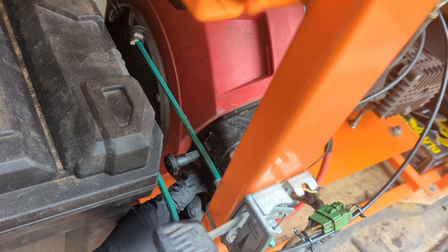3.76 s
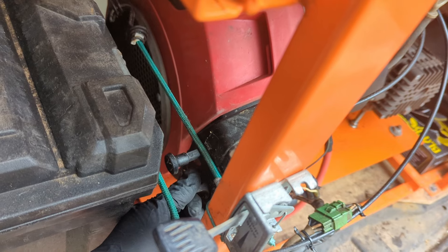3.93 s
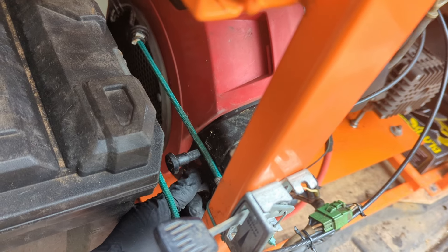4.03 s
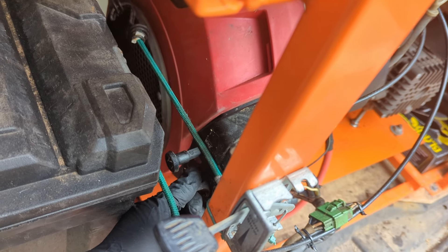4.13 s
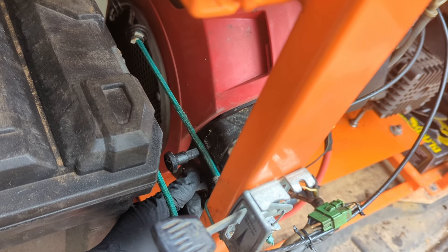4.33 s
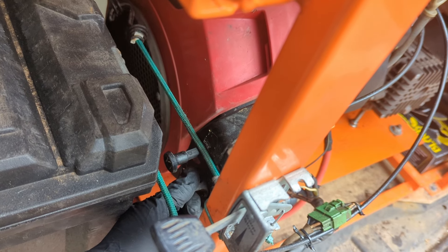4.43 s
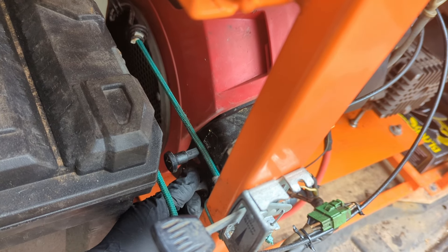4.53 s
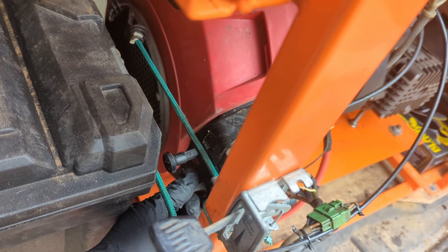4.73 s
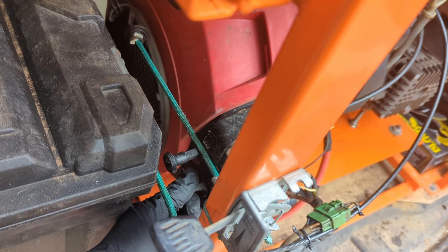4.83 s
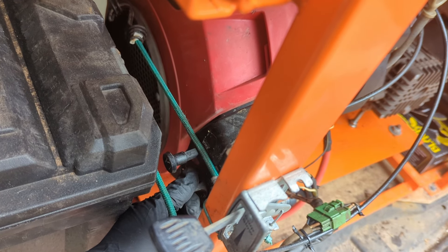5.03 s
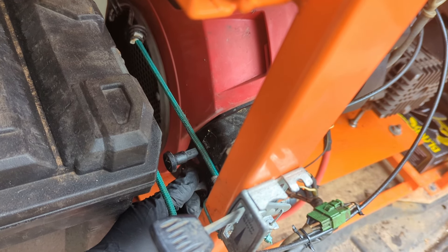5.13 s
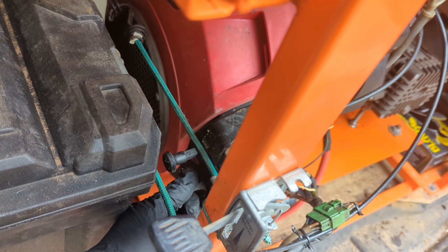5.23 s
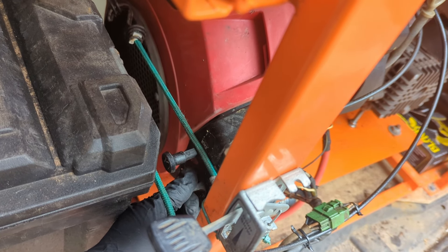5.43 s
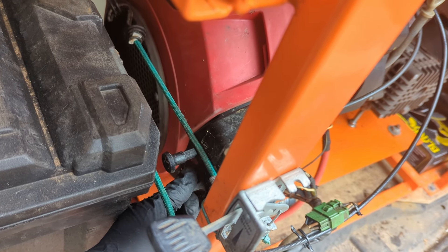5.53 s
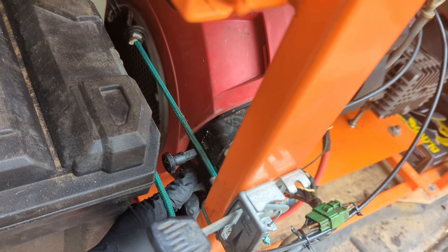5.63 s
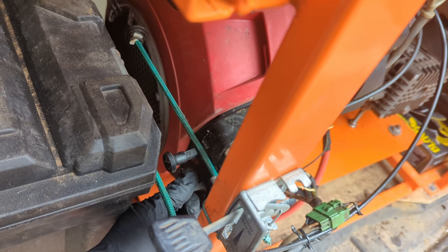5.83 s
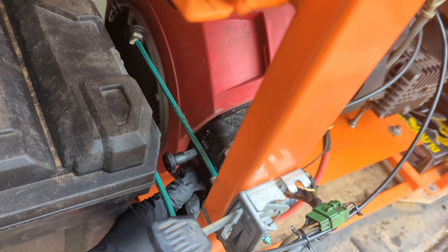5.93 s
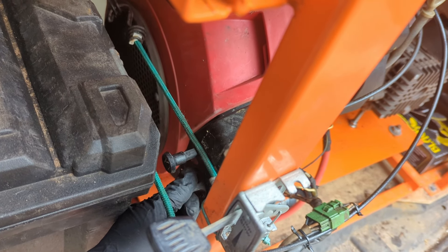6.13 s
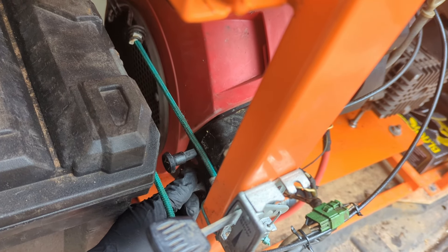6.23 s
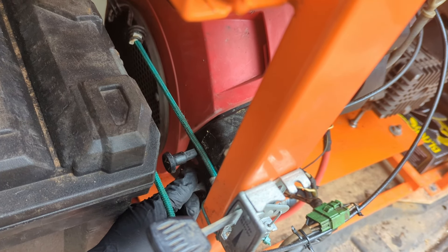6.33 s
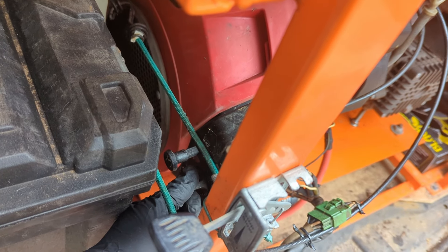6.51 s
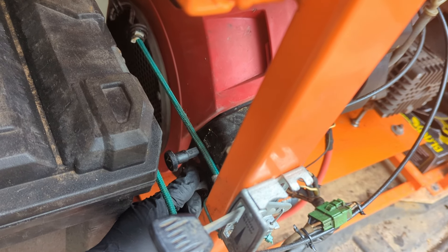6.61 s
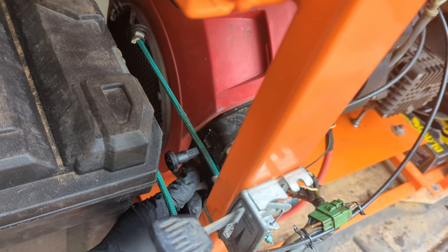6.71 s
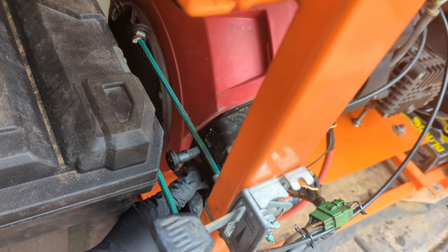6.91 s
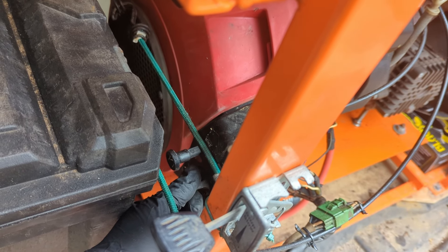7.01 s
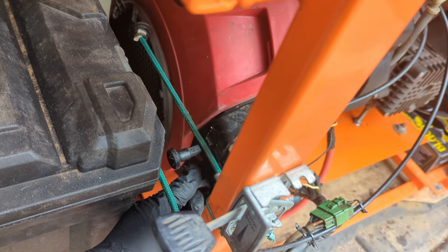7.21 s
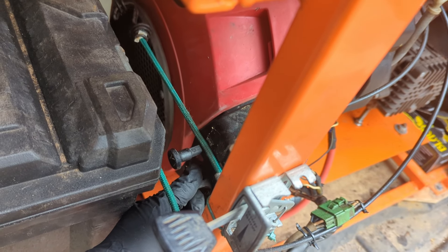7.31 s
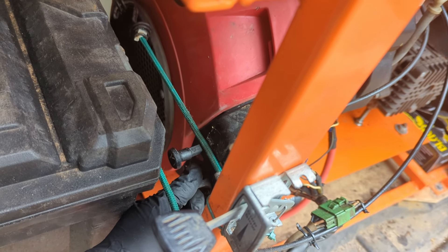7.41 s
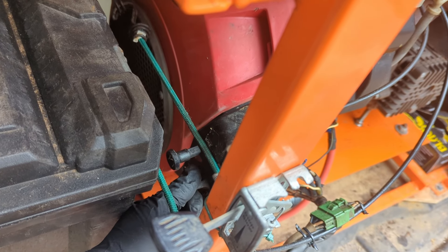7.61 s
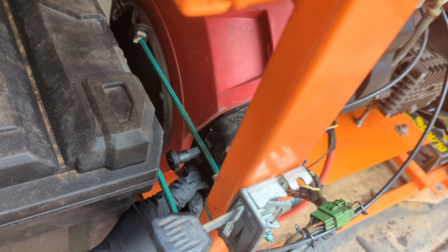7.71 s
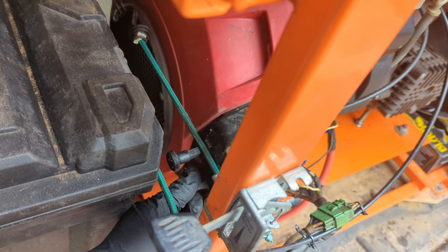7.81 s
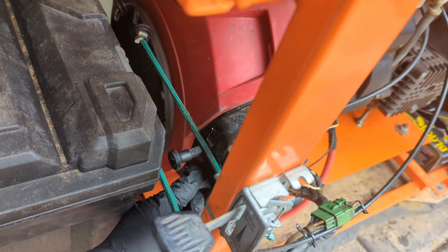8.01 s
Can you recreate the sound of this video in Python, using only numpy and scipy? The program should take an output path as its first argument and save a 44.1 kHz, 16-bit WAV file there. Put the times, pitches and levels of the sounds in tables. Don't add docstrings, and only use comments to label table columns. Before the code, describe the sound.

A hand rustles and a tool taps a relay beside a small petrol engine outdoors. After a sharp knock the starter gear engages, quickly rising into a loud metallic grind and whine, heard very close. It labours in uneven paired dips, with soft bassy valve puffs, for almost six seconds. Then the engine catches briefly three times, with deep thumps, gear slips and brief surges, still cranking at the end.

```python
import sys
import numpy as np
from scipy import signal
from scipy.fft import rfft, irfft, next_fast_len
from scipy.io import wavfile
from scipy.ndimage import uniform_filter1d

SR = 44100
rng = np.random.default_rng(int(sys.argv[2]) if len(sys.argv) > 2 else 0)


def pcm_store(signal):
    levels = np.round(np.clip(np.atleast_2d(signal), -1, 1) * 32767)
    wavfile.write(sys.argv[1], SR, levels.astype(np.int16).T)


def boost_factor(decibels):
    exponent = np.asarray(decibels, float) / 20
    return 10 ** exponent


N = 355604
T = np.arange(N) / SR

SAG = [
    (.395, .11, .045, .025, .215),
    (.745, .09, .025, .045, .135),
]
# compression_top_s, pinion_grips_again_s, kick_hz, coasting_s, exhaust_bang_db
FIRINGS = [
    (7.039, 7.07, 216.4, 0.71, 14),
    (7.253, 7.325, 300, .55, 18),
    (7.972, 8.056, 163, .5, 19.5),
]
EXHAUST_AFTER_S = .03


def evened(x):
    return x / np.sqrt(np.mean(abs(x) ** 2) + 1e-20)


def curve(rows, at, outside=None):
    position, *columns = np.transpose(rows)
    return [np.interp(at, position, column, outside) for column in columns]


def read(points, hz):
    f, value = np.transpose(points)
    return np.interp(np.log(hz + 1), np.log(f + 1), value)


def drift(hz, count):
    points = int(N / SR * hz) + 3
    knots = rng.standard_normal((count, 2, points))
    at, index = T * hz, np.arange(points)
    return np.array([evened(np.interp(at, index, a) + 1j * np.interp(at, index, b)) for a, b in knots])


def passed(x, hz, kind, order):
    return signal.sosfilt(signal.butter(order, hz, kind, fs=SR, output="sos"), x)


def resonate(x, hz, width):
    r = np.exp(-np.pi * width / SR)
    return signal.lfilter([1 - r, 0, r - 1], [1, -2 * r * np.cos(2 * np.pi * hz / SR), r * r], x)


def hiss(spectrum, patchy_db, alike):
    # pitch_hz, likeness (0-1)
    likeness = [(60, .99), (290, .9), (640, .75), (1400, .55), (3000, .5), (7000, .2), (15000, .15)]
    hz = np.fft.rfftfreq(512, 1 / SR)
    a, b, c, d, patches = rng.standard_normal((N // 128 + 5, 257, 5)).T
    patches = uniform_filter1d(patches, size=5, axis=0)
    patches = evened(uniform_filter1d(patches, size=9, axis=1))
    same = np.clip(alike * read(likeness, hz), 0, 1)[:, None]
    left, other = a + 1j * b, c + 1j * d
    z = np.array([left, same * left + np.sqrt(1 - same ** 2) * other])
    z = z * boost_factor(read(spectrum, hz)[:, None] + patchy_db * patches)
    return evened(signal.istft(z, nperseg=512, noverlap=384)[1][:, :N])


def ports(x, turn):
    # pitch_hz, level_db
    lean = [(60, 0.0), (99, 0.0), (160, -4), (270, -1.5), (450, 1), (740, -7.5), (1220, 5), (2010, -1.0),
            (3330, -0.5), (5500, -5), (9080, 7), (15000, -2.5)]
    # pitch_hz, lead_rad
    lead = [(0, -12), (860, 0.74), (1980, 7.5), (2760, 8.5), (3190, 13), (3530, 13.5), (4650, 20),
            (5680, 11.5), (6630, 18.5), (7320, 15.5), (12100, 24), (13100, 16.5), (15200, 38), (16600, 46)]
    size = next_fast_len(N)
    hz = np.fft.rfftfreq(size, 1 / SR)
    half = boost_factor(read(lean, hz) / 2) * np.exp(.5j * turn * read(lead, hz))
    half[hz < 250] = 1
    return irfft(rfft(x, size) * np.array([half, 1 / half]), size)[:, :N]


def quiet():
    # peak_s, rustle_db, rise_s, fall_s
    strokes = [
        (0.0, -54, .01, 0.099),
        (.15, -60, 0.12, 0.017),
        (.45, -48.5, 0.13, 0.076),
        (.72, -44, 0.019, 0.035),
        (.88, -58.5, 0.034, 0.11),
    ]
    hand = 0
    for s, db, rise, fall in strokes:
        hand = hand + boost_factor(db) * np.exp(-np.where(T < s, (s - T) / rise, (T - s) / fall))
    start_s = 1.095
    duck = boost_factor(-9 * np.clip((T - start_s) / .01 + .5, 0, 1))
    rustle_bed = boost_factor(-58 - 4.5 * np.minimum(T, start_s))
    return duck * np.hypot(boost_factor(-59), boost_factor(-3) * hand), duck * np.hypot(rustle_bed, hand)


def air():
    # pitch_hz, level_db (per Hz)
    air_spectrum = [(18, -62), (30, -32), (70, -21), (139, -19), (171, -8.5), (255, -9.5), (506, -3),
                    (625, -7), (1840, -8.5), (3480, -31.5), (12000, -37), (15200, -39), (16500, -50)]
    air_level, rustle_level = quiet()
    wash = hiss(air_spectrum, patchy_db=-0.5, alike=0.63)
    low = evened(passed(wash, 2600, "low", order=4))
    high = evened(passed(wash, 3500, "high", order=4))
    far_machine = evened(resonate(rng.standard_normal(N), 178, 10))
    traffic = evened(resonate(resonate(rng.standard_normal(N), 68, 40), 68, 40))
    outdoors = low + boost_factor(-15.0) * traffic + boost_factor(-14.5) * far_machine
    rustle = high * (1 + 0.27 * drift(150, count=1).real)
    return boost_factor(5.5) * air_level * outdoors + boost_factor(4.5) * rustle_level * rustle


def knocks():
    # start_s, peak_db, low_ring_hz, low_ring_db, fade_60db_s
    tool_knocks = [(0.4443, -27, 444, -6.5, 0.034), (0.4514, -25, 700, -10, 0.062),
                   (0.461, -33, 398, -1, 0.098), (0.7292, -19.5, 306, -11.5, 0.057),
                   (1.0675, -47, 748, 0, 0.03), (1.1424, -46, 355, -15, 0.052),
                   (1.1533, -19, 820, -15, 0.033), (1.1694, -21, 433, -7, 0.21)]
    landing = [
        (.6995, -9, 640, -7, .04),
        (.706, -22, 680, 2, 0.035),
    ]
    slam = [
        (1.176, -16, 175, -20, 0.4),
    ]
    ticks = [(.16, -40, 500, -14, .03), (.29, -47, 500, -15, .015), (.405, -35, 500, -9, .02),
             (.6, -48, 513, -20, .012), (.635, -55, 500, -20, .012), (.685, -52, 500, -15, .015),
             (.845, -41, 500, -20, .015)]
    # pitch_hz, width_hz, level_db
    relay = [(1930, 230, 2.5), (2510, 320, -4), (3510, 470, -2), (4760, 240, 3), (7300, 200, -8),
             (8800, 250, -8)]
    t, out = np.arange(4000) / SR, np.zeros((2, N))
    kinds = [(tool_knocks, 5200), (landing, 12700), (slam, 2500), (ticks, 8000)]
    for rows, top_hz in kinds:
        for s, db, hz, low_db, fade_s in rows:
            shared, *own = rng.standard_normal((3, len(t)))
            burst = shared + 1.6 * np.array(own)
            burst = burst * np.minimum(t / 0.0038, 1) ** 2 * boost_factor(-60 * t / fade_s)
            case = 1.3 * passed(burst, 720, "high", order=2)
            case = case + sum(boost_factor(g) * 3 * resonate(burst, f, w) for f, w, g in relay)
            case = passed(case, top_hz, "low", order=3)
            low = resonate(resonate(burst, hz, 210), hz, 210)
            knock = case / abs(case).max() + boost_factor(low_db) * low / abs(low).max()
            out[:, round(s * SR):][:, :len(t)] += boost_factor(db) * knock
    return out


def crank():
    # start_s, cycles_done
    cycle_starts = [(1.15, 0), (1.31, .43), (1.495, 1), (1.783, 2), (2.067, 3), (5.181, 14), (5.467, 15),
                    (6.911, 20), (7.156, 21), (7.358, 22), (7.58, 23), (7.852, 24), (8.09, 25)]
    rows = list(cycle_starts)
    for top, *_ in FIRINGS:
        n = np.floor(curve(cycle_starts, top)[0])
        rows += [(top, n + .39), (top + EXHAUST_AFTER_S, n + .625)]
    return sorted(rows)


def valves():
    # share_of_cycle, peak_db, push (+) or suck (-), pitch_hz, exhaust_share (0-1)
    puffs = [(0, -32.5, 0.91, 71.6, 0.025), (.115, -50, 1, 90, 0.089), (0.164, -38, -0.56, 100, 0.034),
             (.237, -42, -0.83, 85.5, 0), (.31, -46, 0.89, 55, 0), (.375, -54, 1, 55, 0),
             (.43, -77, 1, 60, 0.81), (0.588, -49, 0.79, 80, 0), (.625, -41, 1, 80, 1),
             (0.692, -42.5, 1, 50, 0), (.76, -61, 1, 65, 0), (.87, -43, -0.99, 75, 0.45)]
    s, cycles = np.transpose(crank())
    t, out = np.arange(-800, 3600) / SR, np.zeros(N + 8000)
    shape = np.exp(-np.where(t < 0, (t / 0.0061) ** 2, t / 0.01))
    bark_shape = np.exp(-np.where(t < 0, (t / 0.034) ** 2, t / 0.035))
    for n in range(25):
        for share, db, sign, hz, exhaust in puffs:
            at = np.interp(n + share, cycles, s)
            weak_db = min(0, 40 * (at - 1.8))
            blow_db = -1.5 + weak_db
            if any(top - 0.138 < at < top for top, *_ in FIRINGS):
                blow_db -= 8
            blow_db += sum(bang for top, *_, bang in FIRINGS if top < at < top + 2 * EXHAUST_AFTER_S)
            db += blow_db if exhaust else weak_db
            puff = shape * np.cos(2 * np.pi * hz * (t - 7.1 * t * abs(t)))
            bark = evened(resonate(rng.standard_normal(len(t)), 370, 370)) * bark_shape
            puff += exhaust * boost_factor(-21.0 + 0.71 * blow_db) * bark
            level = sign * boost_factor(db + 2.1 * rng.standard_normal())
            start = round(at * SR) - 800
            if start + len(t) <= len(out):
                out[start:start + len(t)] += level * puff
    rumble = evened(resonate(resonate(rng.standard_normal(N), 76, 67), 76, 67))
    out = out[:N] + boost_factor(-59.5) * rumble * np.clip((T - 1.2) / .5, 0, 1)
    return np.array([out, np.roll(out, shift=9)])


def gears():
    # start_s, unloaded_tooth_rate_hz, whine_db, slack (clatter of loose teeth, 0-1)
    spin_up = [(1.15, 120, -22, .85), (1.185, 200, 11, .8), (1.215, 272, 15, .8), (1.235, 385, 11, .7),
               (1.255, 425, 6, .4), (1.305, 398, 6, .4), (1.322, 585, 7, .03), (1.4, 598, 7, .05),
               (1.53, 650, 3, .05)]
    steady = [(1.75, 669.1, 1.8, 0.073), (5.2, 668.7, 3.14, 0.043), (5.8, 661.2, 4.2, 0.075),
              (7.02, 661, 4.95, 0.081), (8.06, 668.3, 3.7, 0.035)]
    free_hz, whine_db, slack = curve(spin_up + steady, T)
    over_hz, charge = np.zeros((2, N))
    for top, grip, kick_hz, coast, _ in FIRINGS:
        overrun = np.clip((T - top) / (grip - top), 0, 1)
        coasting = np.clip(1 - (T - grip) / coast, 0, 1) ** 2
        over_hz = (1 - overrun) * over_hz + overrun * kick_hz * coasting
        let_go = np.clip(1 + (T - top) / 0.013, 0, 1)
        settle = np.exp(-np.maximum(T - grip, 0) / .15) * let_go
        whine_db = whine_db + settle * np.where(T < grip, -7, 4)
        slack = np.maximum(slack, .75 * settle)
        charge += np.clip(1 + (T - top) / 0.138, 0, 1) * (1 - overrun)
    load = 1 - np.exp(-np.maximum(T - 1.31, 0) / .075)
    load = load * np.clip(1 - over_hz / 258.6, .1, 1)
    return free_hz + over_hz, whine_db, np.clip(slack, 0, 1), load + .35 * charge


def compression(share):
    exhaust_stroke = np.clip(1 - np.minimum(share, 1 - share) / .2, 0, 1)
    lost = -.014 + .032 * exhaust_stroke
    for top, build, hang, release, depth in SAG:
        lost = lost + depth * np.interp(share, [top - hang - build, top - hang, top, top + release], [0, 1, 1, 0])
    return lost


def effort_db():
    # start_s, level_db
    effort = [(1.14, -80), (1.156, -43), (1.17, -28), (1.19, -38), (1.21, -32), (1.3, -28), (1.536, -25.5),
              (6.95, -27), (8.06, -28)]
    # contact_again_s, depth_db, fade_s
    slips = [(7.066, -5, .05), (7.117, -4, .015), (7.27, -4, .03), (7.33, -11, .045), (7.456, -7, .025),
             (7.531, -5, .025), (7.69, -6, .015), (7.775, -3, .015), (7.995, -4, .04), (8.047, -9, .04)]
    level_db = curve(effort, T, -99)[0]
    for s, db, fade in slips:
        level_db = level_db + db * np.interp(T, [s - fade, s - fade / 2, s - .003, s], [0, 0.96, 1, 0])
    return level_db


def starter():
    # multiple_of_tooth_rate, level_db
    teeth = [(1, -4), (2, -4.5), (3, -1.5), (4, -11), (5, -9.5), (6, -13), (7, -15.5), (8, -12), (9, -9),
             (10, -9), (11, -11.5), (12, -8.5), (13, -14.5), (14, -11.5), (15, -20.5)]
    # pitch_hz, level_db
    let_out = [(150, 9.5), (400, 8.5), (520, 2.5), (585, 5.5), (622, 0.5), (655, 5), (800, 2), (1000, -2),
               (1300, 2), (1700, 3), (2050, -6), (2330, -10), (2650, -11), (4000, -14.5), (5500, -5),
               (12000, 4)]
    # pitch_hz, level_db (per Hz)
    grind_spectrum = [(140, -48), (230, -13), (487, -21.5), (660, -9), (722, -9.5), (1050, -9.5),
                      (1300, -8.5), (1500, -6), (1970, -3.5), (2310, -15.5), (2660, -5), (3670, -13),
                      (6400, -10), (15100, -20.5), (16500, -29)]
    # pitch_hz, width_hz, level_db
    housing = [(431, 40, -2), (573.7, 35.4, -1), (1087, 146, -11.5), (1302, 83, -12.5), (1194, 130, -7),
               (1610, 16.4, -9), (1758, 9, 3), (1740, 9.7, -3), (1926, 37, -1), (2016.5, 79, 2.5),
               (2880, 6.3, 6), (4550, 366, 1), (5000, 26, 8.5), (5472, 56, 1.5), (5860, 25, -1),
               (6220, 150, 1.5), (6500, 24, 13.5), (8650, 420, -0.5), (11730, 650, 1.5)]
    share = curve(crank(), T)[0] % 1
    free_hz, whine_db, slack, load = gears()
    sag = load * compression(share) * (1 + 0.05 * drift(5, count=1)[0].real)
    strain = np.maximum(sag, 0)
    jitter = .0025 + .04 * slack + .07 * abs(sag)
    hz = free_hz * (1 - sag) * (1 + jitter * drift(60, count=1)[0].real)
    turns = np.cumsum(hz) / SR
    loose = np.clip(np.gradient(uniform_filter1d(hz, size=400)) * SR / 9000, 0, .9)
    pinion = 1 + 0.12 * np.cos(2 * np.pi * turns / 11)
    pinion += 0.024 * np.cos(2 * np.pi * turns / 24) + 0.2 * np.cos(2 * np.pi * turns / 6)
    first_top, second_top = SAG[0][0], SAG[1][0]
    between = abs(share - (first_top + second_top) / 2) < (second_top - first_top) / 2
    light = uniform_filter1d(1. * between, size=400)

    whine = np.zeros((2, N))
    tooth, tone = np.exp(2j * np.pi * turns), 1
    for k, db in teeth:
        tone = tone * tooth
        shared, apart = drift(40 + 22 * k, count=2)
        roughness = .13 + .04 * k + 1.2 * slack + 1.1 * strain
        fuzz = 1 + roughness * (shared + .9 * np.array([apart, -apart]))
        out_db = db + read(let_out, k * hz[::32]) - read(let_out, k * 588.0)
        out_db -= 5.5 * slack[::32] * abs(k - 2.4)
        out_db -= 5 * light[::32] / k ** 2
        whine += np.repeat(boost_factor(out_db), 32)[:N] * (fuzz * tone * np.exp(2j * np.pi * rng.random())).real
    whine = boost_factor(5.0 + whine_db + 26.0 * np.minimum(sag, .15)) * evened(whine)
    whine = whine * pinion * (1 - loose) / (1 + 1.2 * slack)

    clatter = (1 + slack) ** (0.4 * drift(90, count=1)[0].real)
    throb = 1 + 0.34 * np.cos(2 * np.pi * turns) + 0.084 * drift(70, count=1)[0].real
    grind_db = 2.5 - 6.1 * np.minimum(sag, .2) + 4 * loose + 5 * slack
    grind = boost_factor(grind_db) * hiss(grind_spectrum, patchy_db=3.0, alike=0.99) * throb
    drive = (whine + grind) * clatter
    direct = (whine * boost_factor(-45 * strain) + grind) * clatter
    rung = direct + sum(boost_factor(db) * resonate(drive, f, width) for f, width, db in housing)
    rung = passed(rung, 228, "high", order=4)
    return ports(evened(rung), turn=0.88) * boost_factor(effort_db() + 5.0)


def scene():
    return air() + knocks() + valves() + starter()


def top_cut(x):
    return signal.sosfilt(signal.butter(12, 17030, fs=SR, output="sos"), x)


def record(dry):
    edge = signal.firwin(801, 16020, window=("kaiser", 9), fs=SR)
    heard = passed(dry, 32, "high", order=4)
    mix = signal.oaconvolve(heard, edge[None], "same")
    return top_cut(mix)


dry = scene()
out = record(dry)
pcm_store(out)
```